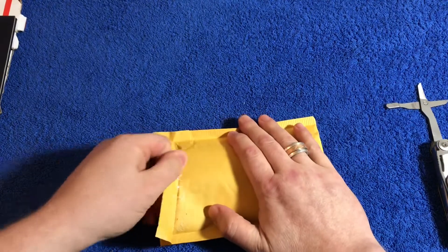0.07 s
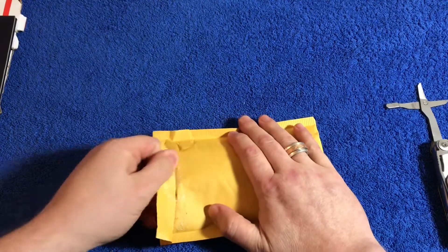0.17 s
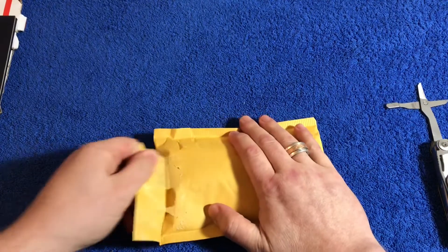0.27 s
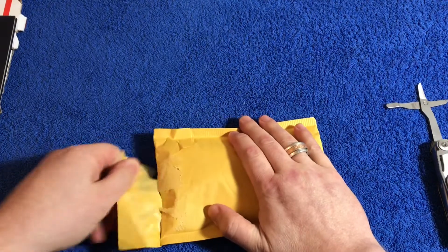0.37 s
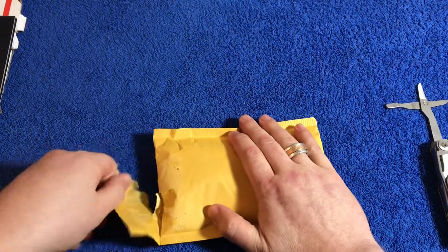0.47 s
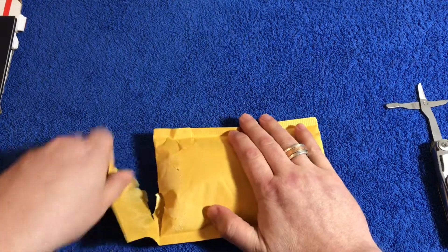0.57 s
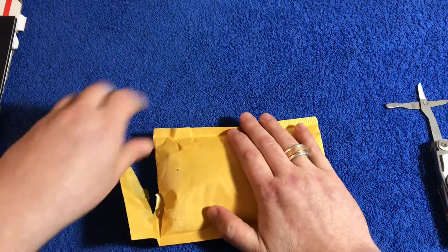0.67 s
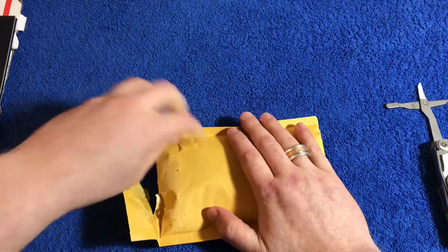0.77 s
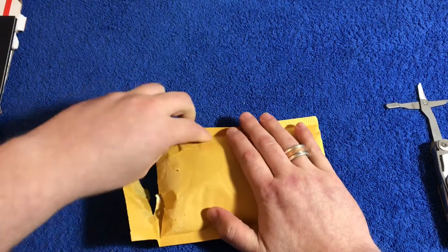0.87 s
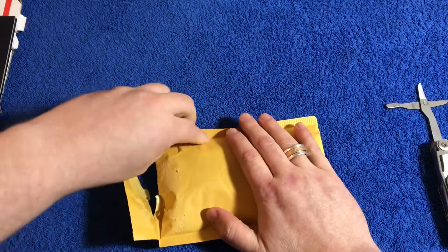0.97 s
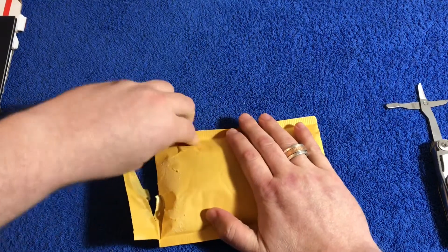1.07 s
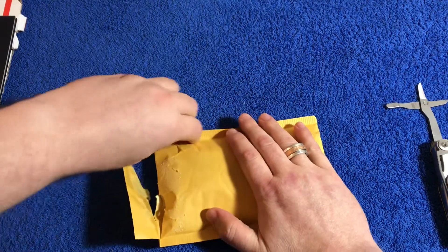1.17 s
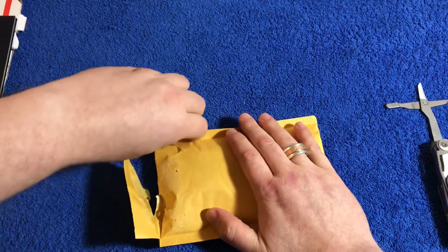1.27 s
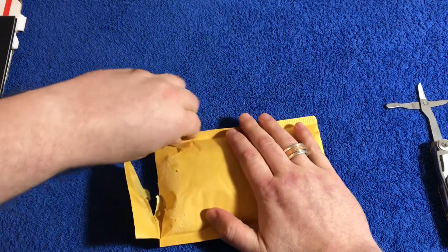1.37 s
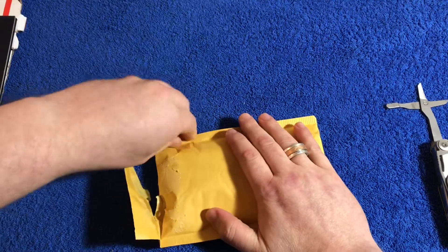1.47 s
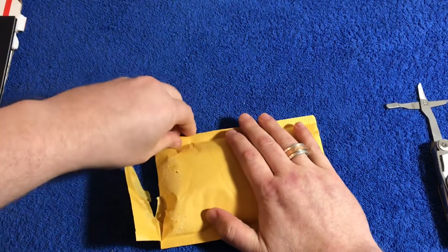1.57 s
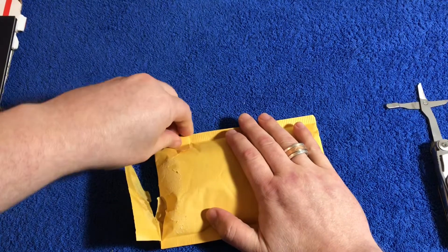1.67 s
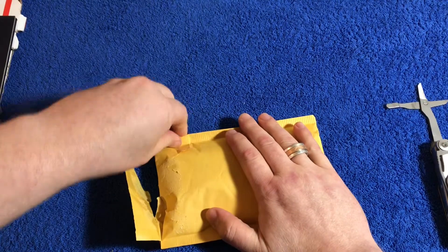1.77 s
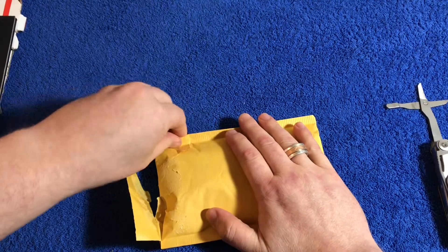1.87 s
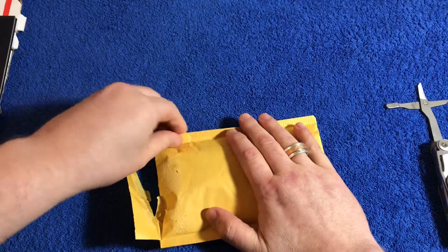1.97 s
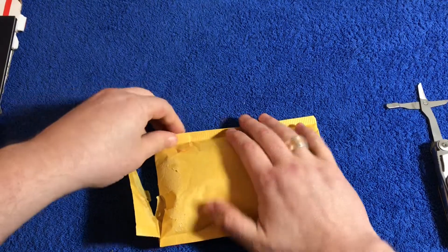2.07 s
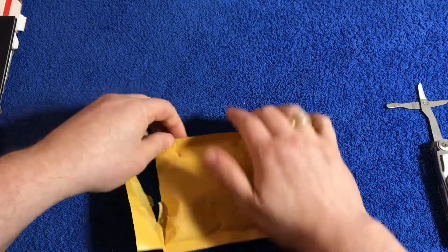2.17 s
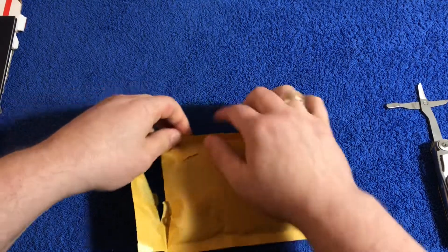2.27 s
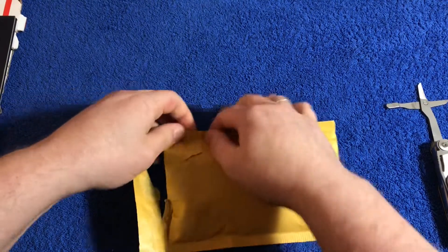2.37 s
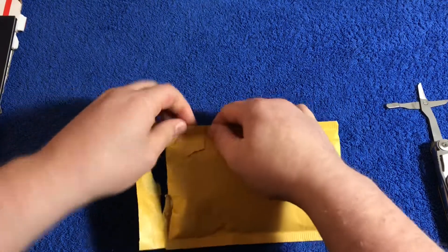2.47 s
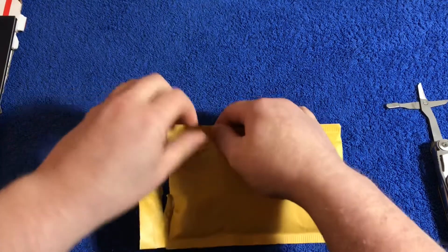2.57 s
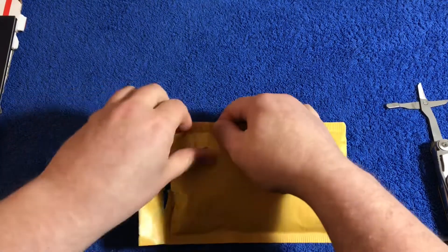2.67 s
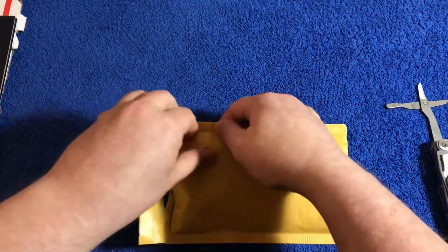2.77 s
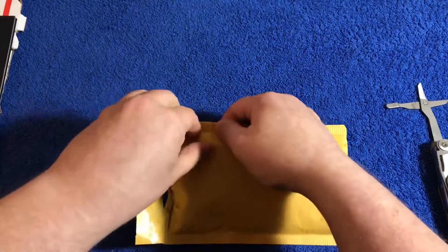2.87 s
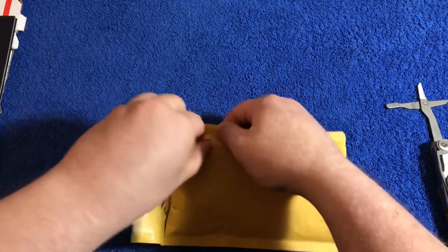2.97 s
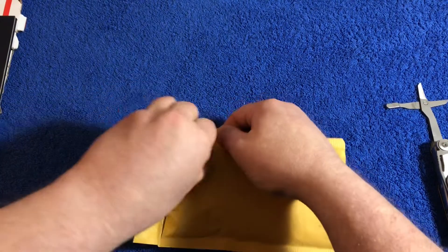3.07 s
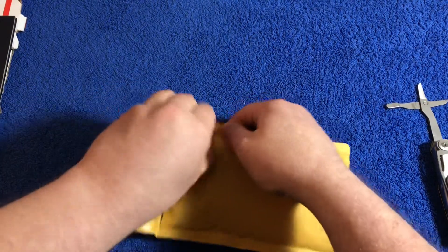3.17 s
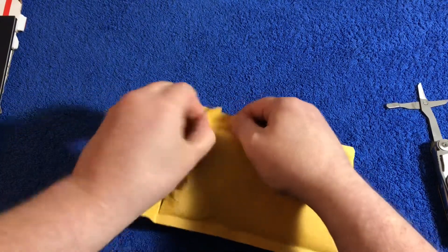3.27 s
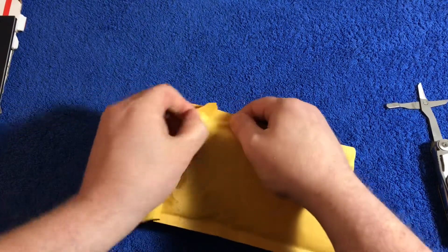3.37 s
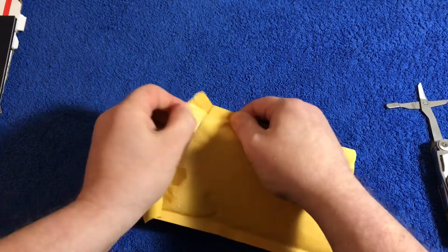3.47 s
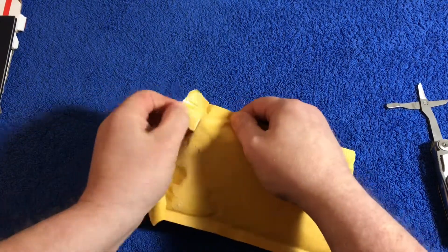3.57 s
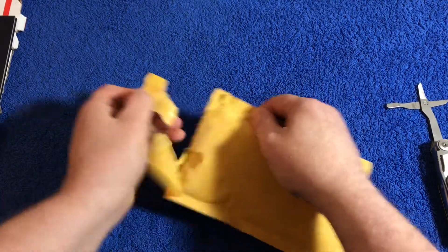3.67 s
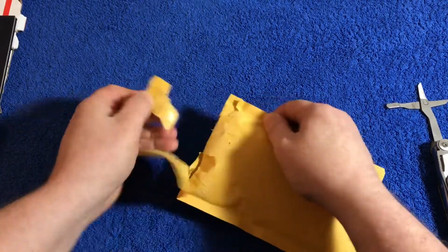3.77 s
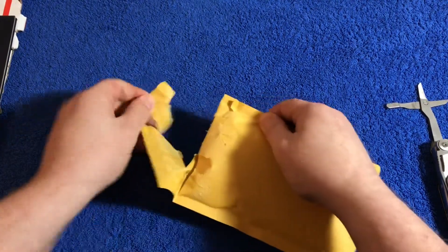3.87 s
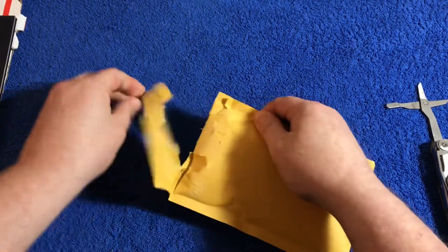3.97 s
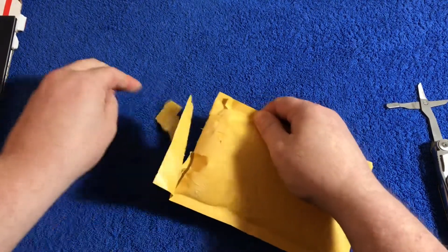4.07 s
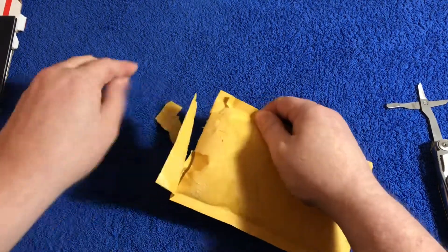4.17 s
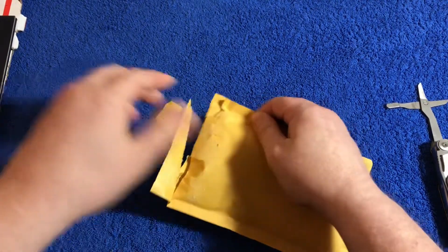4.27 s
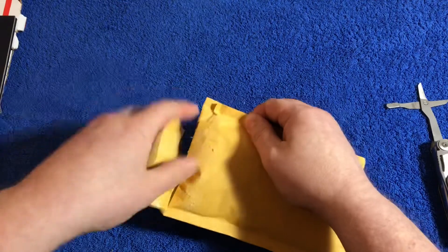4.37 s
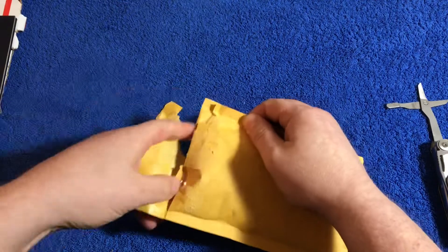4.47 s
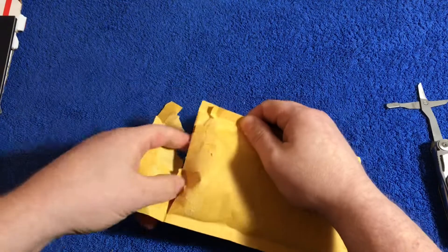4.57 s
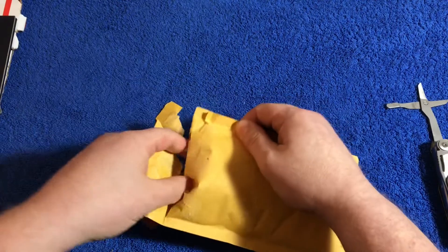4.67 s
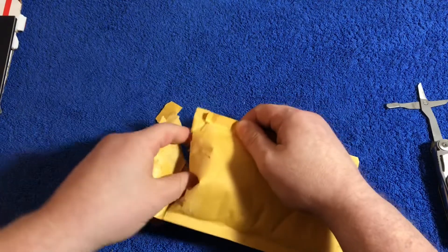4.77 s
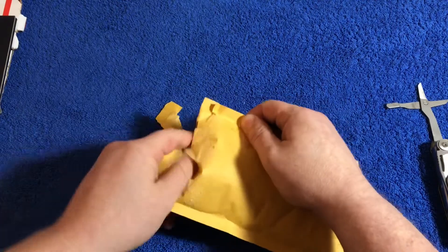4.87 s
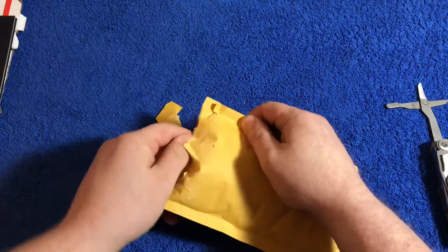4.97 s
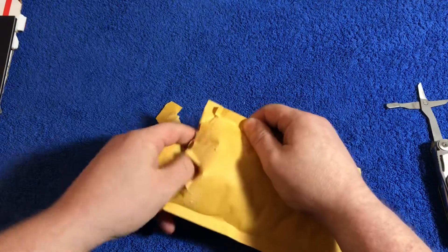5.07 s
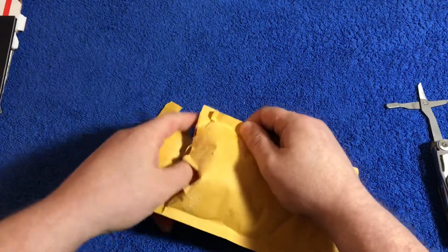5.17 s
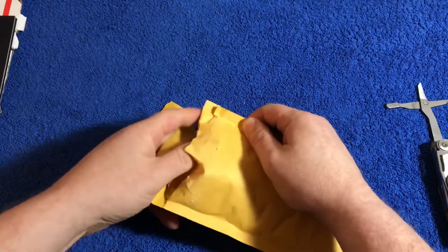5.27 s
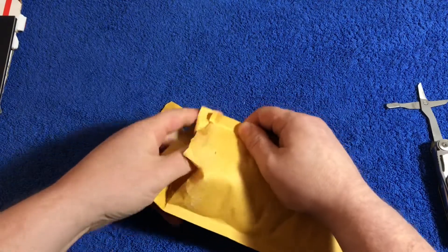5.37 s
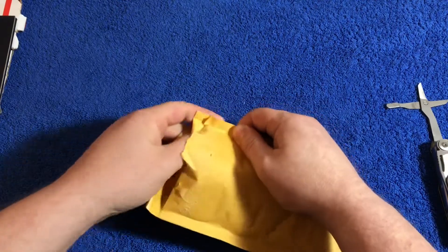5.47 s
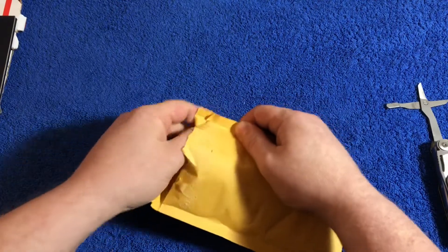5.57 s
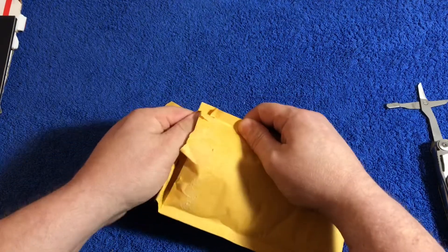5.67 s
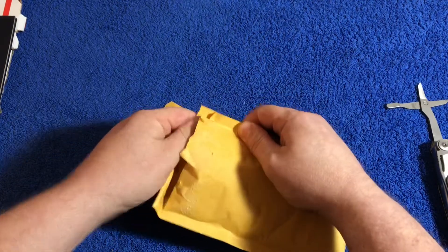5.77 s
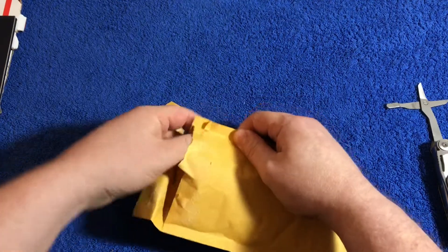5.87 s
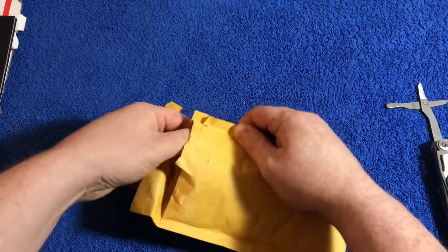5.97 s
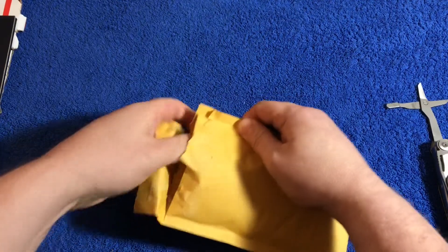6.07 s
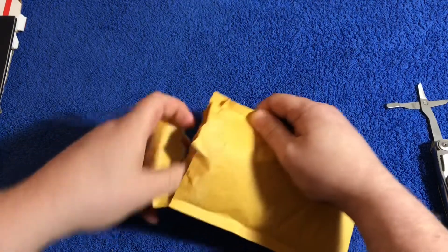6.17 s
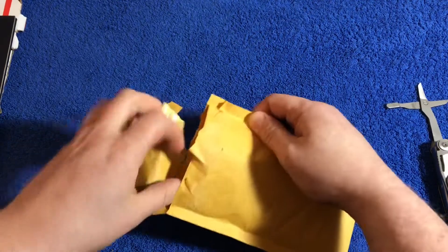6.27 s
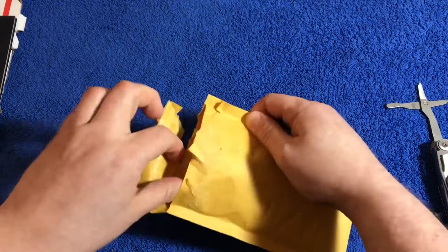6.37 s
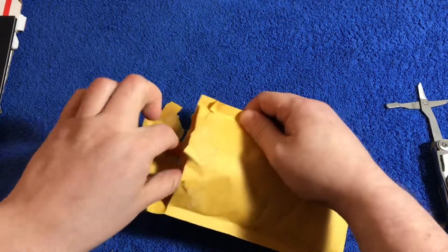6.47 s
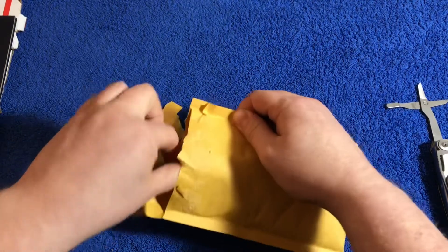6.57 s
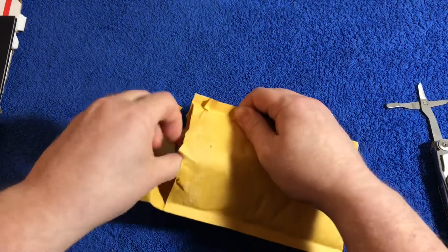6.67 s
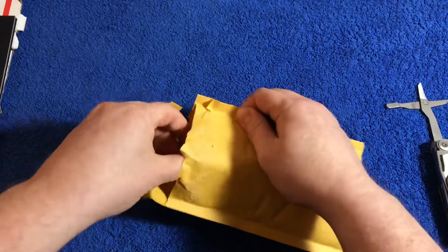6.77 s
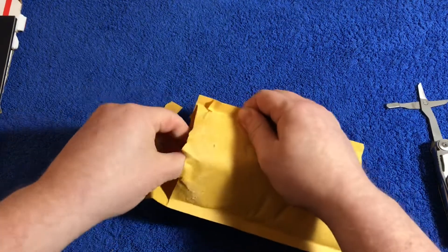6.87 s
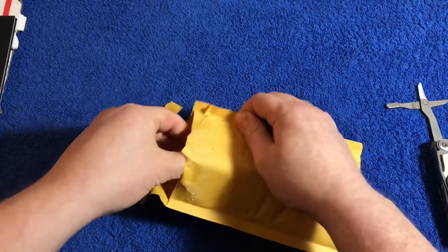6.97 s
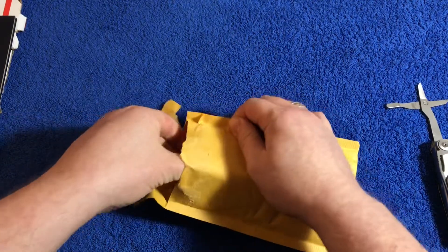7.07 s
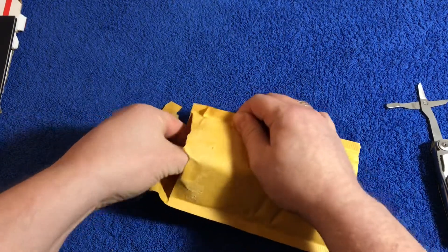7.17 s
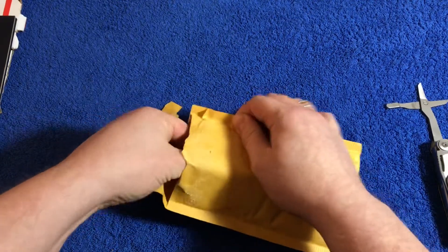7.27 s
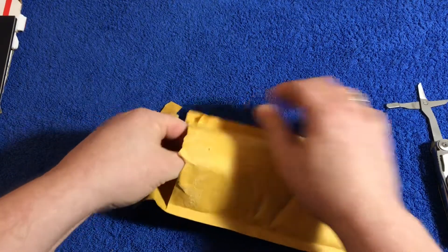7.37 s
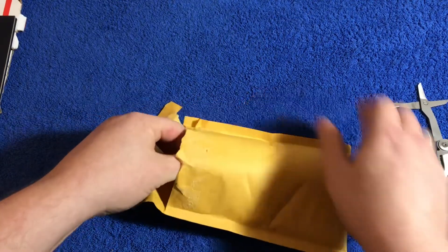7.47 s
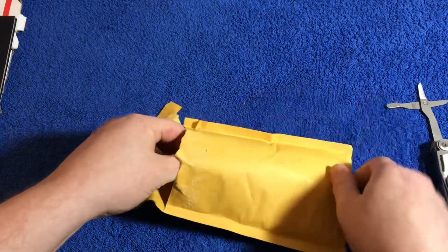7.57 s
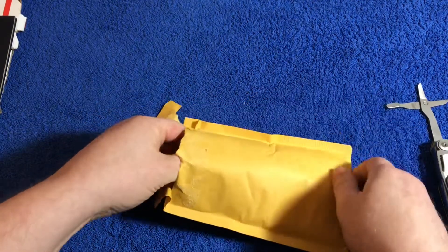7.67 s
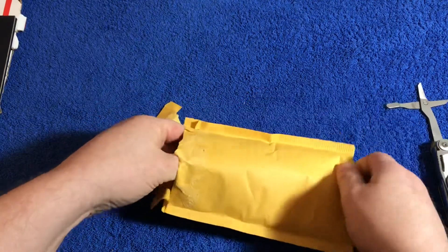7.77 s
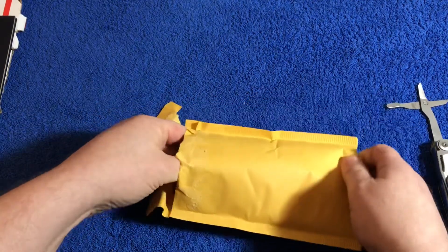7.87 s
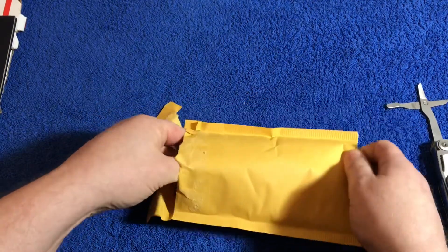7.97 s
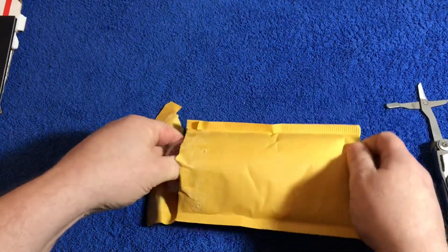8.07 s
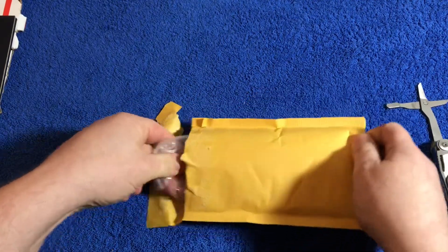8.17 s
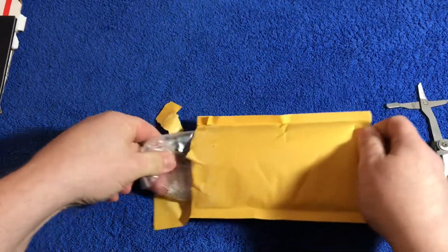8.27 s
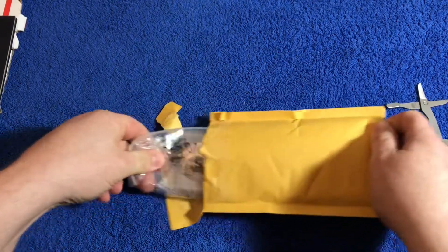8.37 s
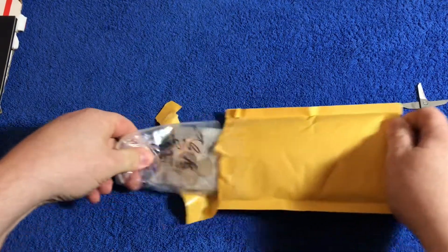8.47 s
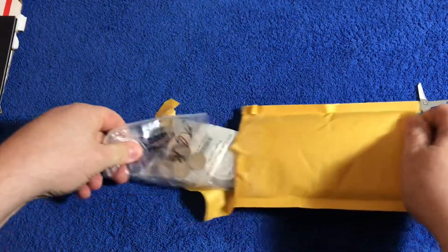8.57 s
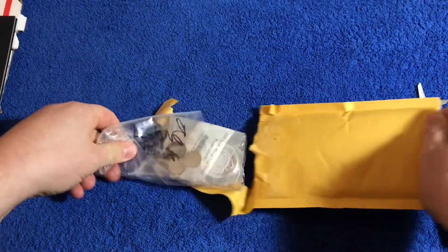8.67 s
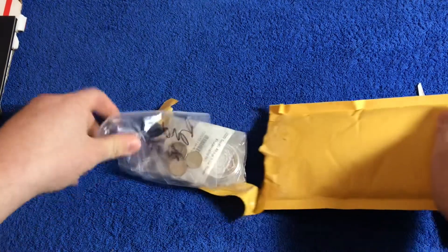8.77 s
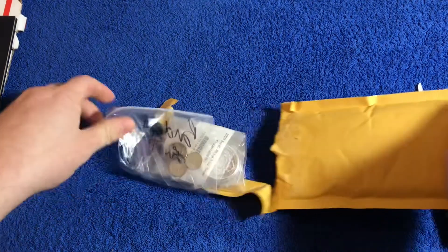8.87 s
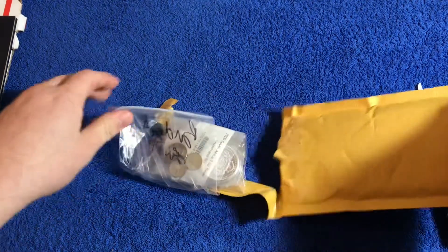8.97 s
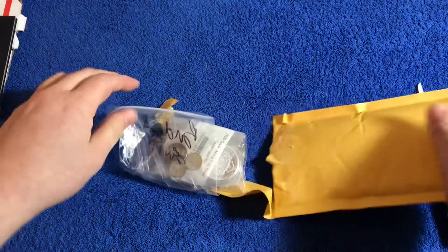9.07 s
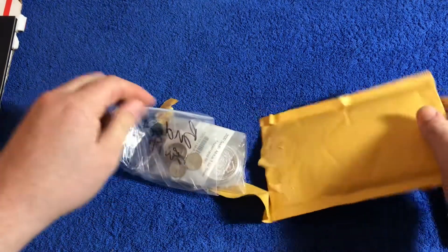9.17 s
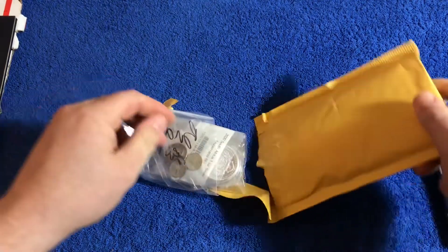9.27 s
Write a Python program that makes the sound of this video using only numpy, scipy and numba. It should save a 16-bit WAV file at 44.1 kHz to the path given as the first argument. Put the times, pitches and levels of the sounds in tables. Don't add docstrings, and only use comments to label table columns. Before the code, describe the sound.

Stiff padded paper tears in quick bursts, then crinkles, pops and rustles more softly as something is drawn out in a quiet room.

```python
import sys
import numpy as np
from scipy import signal
from scipy.fft import rfft, irfft
from scipy.io import wavfile
from scipy.ndimage import uniform_filter1d
from numba import njit

SR = 44100
rng = np.random.default_rng(int(sys.argv[2]) if len(sys.argv) > 2 else 0)


def int16_out(signal):
    q = np.round(np.clip(np.atleast_2d(signal).T, -1, 1) * 32767)
    wavfile.write(sys.argv[1], SR, q.astype(np.int16))


def gain_from_db(level_db):
    decades = np.asarray(level_db, float) / 20
    return 10 ** decades


N = 410130

# peak_s, crinkle_db, rise_ms per 10 dB, fall_ms per 10 dB, fibres_db re crinkle
RIP_MOVES = [(.1, -46.5, 900, 64, 3.5), (.174, -28, 48, 118, -0.5), (.27, -32, 160, 66, -1),
             (0.33, -22.5, 82, 25, -5), (0.404, -24.5, 24, 44, -6), (.49, -36.5, 30, 100, -13),
             (3.209, -32, 27, 33, -7.5), (3.404, -42, 93, 74, 4), (3.541, -22.5, 4, 64, -3),
             (3.591, -32.5, 56.5, 10, 6.5), (4.515, -37, 31, 83, -8.5), (4.592, -38, 58, 300, -7),
             (4.783, -33.5, 27, 48, -4), (5.221, -23.5, 19, 14.5, -5.5), (5.765, -42, 68, 130, -4.5)]
PICK_MOVES = [(0.752, -45, 1.9, 44, 1.5), (0.796, -37.5, 19, 28, -2.5), (1.003, -42.5, 67, 33, -5),
              (1.236, -44, 37, 170, -16), (1.442, -46.5, 38, 49, -3), (1.685, -44, 30, 27, -4.5),
              (2.05, -50, 71, 54, -3), (2.29, -47.5, 26, 66, -2.5), (2.322, -44, 38, 60, -18),
              (2.776, -59.5, 150, 58, 9), (2.864, -44, 20, 140, -6.5), (3.905, -58.5, 450, 12, 2),
              (4.13, -56.5, 12, 79, -14.5), (6.077, -41, 270, 120, -9), (8.259, -29.5, 23, 44, -18),
              (9.026, -37.5, 86, 120, -14.5)]
SQUEEZE_MOVES = [(0.447, -27, 12, 18, -5.5), (1.926, -36, 36, 50, -9.5), (2.175, -42.5, 166, 39, -16),
                 (2.438, -41.5, 80, 44, -10), (2.582, -35, 11, 46, -13), (3.006, -40, 82, 34, -6.5),
                 (3.27, -31, 52, 99, -14), (3.487, -43, 170, 14, -17), (3.66, -41, 95, 187, -10),
                 (4.296, -47, 5.6, 97, -3.5), (4.346, -36, 17, 94, -4.5), (4.82, -26.5, 3, 23, 3.5),
                 (4.85, -29, 34, 61, -6), (4.991, -35, 27, 120, -6), (5.321, -42.5, 18, 6.3, 15),
                 (5.353, -31.5, 114, 200, -11.5), (5.544, -34.5, 12, 130, -7), (5.575, -31, 48, 60, -4)]
REACH_MOVES = [(6.113, -42, 37, 200, -5.5), (6.337, -49, 77, 34.4, 4.5), (6.501, -39, 150, 90, -11.5),
               (6.588, -37.5, 36, 31.8, -12), (6.694, -37.5, 20, 45.5, -9), (6.894, -38.5, 59, 150, -8.5),
               (7.148, -41, 370, 100, -9), (7.333, -33, 143, 78, -10.5), (7.518, -37, 11, 120, -11.5),
               (7.675, -34, 110, 147, -12.5), (8.041, -43.5, 330, 300, -8), (8.488, -39.5, 470, 240, -9),
               (8.754, -42, 160, 141, -11), (9.29, -52.5, 93, 100, -3)]
MOVE_KINDS = (RIP_MOVES, PICK_MOVES, SQUEEZE_MOVES, REACH_MOVES)


def unit(x):
    return x / np.sqrt(np.mean(x ** 2))


def colour(x, table):
    hz, db = np.transpose(table)
    grid_hz = np.linspace(1, SR / 2, 8193)
    log_gain = np.interp(np.log(grid_hz), np.log(hz), db) * np.log(10) / 20
    cepstrum = irfft(log_gain)
    cepstrum[1:8192] *= 2
    cepstrum[8193:] = 0
    impulse = irfft(np.exp(rfft(cepstrum)))
    return signal.fftconvolve(x, impulse)[:N]


def walk(rate):
    hold = int(SR / rate)
    steps = np.repeat(rng.standard_normal(N // hold + 1), hold)
    return unit(uniform_filter1d(steps, hold // 2 + 1)[:N])


def room():
    # hz, level_db per Hz
    air_colour = [(25, -17), (42, -11), (53, 2.5), (68, -6.5), (100, -7), (165, -10), (260, -10),
                  (330, -11.5), (450, -24.5), (2000, -34.5), (6000, -29.5), (16000, -46)]
    air = unit(colour(rng.standard_normal(N), air_colour)) * gain_from_db(-61.5 + 0.13 * walk(1.0))
    hum_hz, hum_db = 120, -63
    hum = np.sin(2 * np.pi * hum_hz * np.arange(N) / SR) * gain_from_db(hum_db + 1.6 * walk(12))
    return air + hum


def rumble():
    # time_s, level_db
    drone_level = [
        (0, -75),
        (1.0, -77),
        (1.3, -61),
        (1.9, -68),
        (2.4, -76),
        (6.4, -93),
        (7.0, -58),
        (7.5, -63),
        (7.9, -70),
        (8.4, -74),
    ]
    centre_hz = 50.7
    band_hz = [centre_hz / 1.2, centre_hz * 1.2]
    band = signal.butter(2, band_hz, "band", fs=SR, output="sos")
    low = signal.sosfilt(band, rng.standard_normal(N))
    return unit(low) * gain_from_db(np.interp(np.arange(N) / SR, *np.transpose(drone_level)))


def tail(x):
    t60_s, level_db, dull_hz = 0.084, -15.5, 4300
    t = np.arange(SR // 2) / SR
    fade = np.exp(-np.log(1000) * t / t60_s) * (1 - np.exp(-t / 0.0005))
    echo = rng.standard_normal(len(t)) * fade
    echo = signal.lfilter(*signal.butter(1, dull_hz, fs=SR), echo)
    echo = echo / np.sqrt(np.sum(echo ** 2))
    return gain_from_db(level_db) * signal.fftconvolve(x, echo)[:N]


@njit
def pops(count, start, hz, t60, size, rate, rise):
    out = np.zeros(count)
    for k in range(len(start)):
        turn = np.exp(2j * np.pi * hz[k] / rate - np.log(1000) / (t60[k] * rate))
        unrisen_step = np.exp(-hz[k] / (rise * rate))
        unrisen = 1.
        z = size[k] + 0j
        first = int(start[k])
        for i in range(first, min(count, first + int(t60[k] * rate))):
            z = z * turn
            unrisen = unrisen * unrisen_step
            out[i] += z.imag * (1 - unrisen)
    return out


def ring(s, hz, cycles, size, rise=0.042):
    start = np.clip(s * SR, 0, N - 1.)
    return pops(N, start, hz, cycles / hz, size, 1. * SR, rise)


def bumps(count=4):
    # start_s, pitch_hz, level_db
    pushes = [(8.745, 196, -42), (0.391, 300, -30.5), (0.415, 85, -43), (0.51, 340, -45),
              (3.555, 194, -37.5), (3.569, 72, -51), (7.252, 330, -33), (7.518, 64, -44), (4.985, 580, -21),
              (5.307, 408, -34), (5.771, 280, -42), (6.447, 360, -37), (8.03, 430, -40.5),
              (7.516, 950, -19), (2.003, 460, -40), (9.13, 390, -43), (1.227, 680, -42), (2.109, 840, -32),
              (2.59, 510, -55), (4.34, 750, -34), (4.82, 600, -26), (5.32, 540, -23.5), (8.245, 1100, -37),
              (8.4, 830, -31), (8.987, 1000, -29), (9.013, 440, -40), (.425, 590, -34)]
    s, hz, db = np.transpose(pushes)[:, :, None]
    late, step = np.moveaxis(rng.random((len(s), 2, count)), 1, 0)
    mode_hz = hz * 1.256 ** (np.arange(count) - 1 + step - .5)
    start_s = s + 2.35 * late / hz
    size = gain_from_db(db + 7.5) + 0 * late
    return ring(start_s.ravel(), mode_hz.ravel(), 7.7, size.ravel(), rise=0.94)


def fits(per_s, tau_s):
    kicks = (rng.random(N) < per_s / SR) * np.minimum(rng.exponential(size=N), 3)
    return signal.lfilter([1], [1, -np.exp(-1 / (tau_s * SR))], kicks)


def moves(grip_db, haste, extra_db):
    # time_s, crinkle_db
    finger_grip = [(0, -35), (.5, -53), (.73, -57.5), (.85, -48.5), (1.1, -48), (1.4, -55.5), (1.62, -59.5),
                   (1.87, -81), (2.0, -46), (2.53, -57.5), (2.68, -45.5), (3.15, -43.5), (3.95, -70),
                   (4.28, -76), (4.7, -59), (5.2, -40.5), (5.9, -62), (9.3, -48)]
    t = np.arange(0, N, 32) / SR
    power = gain_from_db(np.interp(t, *np.transpose(finger_grip)) + grip_db) ** 2
    for (s, db, rise_ms, fall_ms, _), extra in zip(np.concatenate(MOVE_KINDS), extra_db):
        ms_per_10_db = np.where(t < s, max(rise_ms, 2), max(fall_ms, 2))
        below_peak_db = haste * 10 * 1000 * np.abs(t - s) / ms_per_10_db
        power = power + gain_from_db(db + extra - below_peak_db) ** 2
    return np.interp(np.arange(N) / SR, t, 10 * np.log10(power))


def rustle(lo_hz, hi_hz, clumps, loose, cycles, scatter_db, count):
    # hz, level_db per Hz
    paper_colour = [(120, -17), (330, -8), (700, -7), (1000, -3.5), (1700, -1.5), (3000, -4), (3750, -4.5),
                    (4300, -4.5), (4950, -7), (6000, -3.5), (7800, -9.5), (9300, -7.5), (10500, -12.5),
                    (11500, -8)]
    when, pitch, turn = rng.random((count, 3)).T
    at = (when * N).astype(int)
    hz = lo_hz * (hi_hz / lo_hz) ** pitch
    rare = np.minimum(rng.exponential(size=count), 5)
    favoured_db = 4.56 * np.cos(2 * np.pi * 1.3 * np.log2(hz) + 2.37 * walk(25)[at])
    size = gain_from_db(loose[at] * scatter_db * (rare - 6.0) + favoured_db)
    size = size * np.sign(turn - .5) * hz / hi_hz * clumps[at]
    return unit(colour(ring(when * N / SR, hz, cycles, size), paper_colour))


def hollow(clumps, count=9000):
    # time_s, pitch_hz, level_db re crinkle
    pouch_pitch = [(0, 1405, 0), (.2, 1510, 1.5), (.33, 1910, 5.5), (.43, 2500, 2), (.6, 1520, -5),
                   (2.48, 1430, -3.5), (2.72, 1880, -11), (3.3, 1430, -23), (3.94, 2130, -10),
                   (4.25, 1510, -1.5), (4.79, 1670, -5), (5.0, 980, 2), (5.3, 1670, -31), (6.24, 1340, -5),
                   (7.4, 1154, -5), (8.3, 1230, -3.5), (8.75, 1660, -7), (9.0, 1080, -6)]
    when, spread, turn, rare = rng.random((count, 4)).T
    s, centre_hz, db = np.transpose(pouch_pitch)
    order = np.argsort(np.argsort(when))
    drift = unit(uniform_filter1d(turn - .5, size=90))[order]
    hz = np.interp(when * N / SR, s, centre_hz) * 1.47 ** (spread - .5) * 1.185 ** drift
    size = gain_from_db(np.minimum(-2.5 * np.log(rare), 12)) * np.sign(turn - .5)
    size = size * clumps[(when * N).astype(int)]
    air = unit(ring(when * N / SR, hz, 18.4, size, rise=0.28))
    return air * gain_from_db(np.interp(np.arange(N) / SR, s, db))


def handling():
    panel_flex = [
        -19,
        -20.5,
        -2,
        -3,
    ]
    flex_db = np.repeat(panel_flex, [len(k) for k in MOVE_KINDS])
    fibre_extra_db = np.concatenate(MOVE_KINDS)[:, -1]
    crease_db = moves(0, 1, 0 * flex_db)
    panel_db = moves(-11, 1.49, flex_db)
    fibre_db = moves(-14, 1.4, fibre_extra_db)
    loose = np.clip((-23.0 - fibre_db) / 18, .35, 1)
    whole = fits(90, .0015)
    panel_clumps = 1 + loose * (0.24 * whole + 0.55 * fits(49, 0.011))
    panels = rustle(151.4, 998, panel_clumps, loose, cycles=12.0, scatter_db=2.0, count=9000)
    crease_clumps = 1 + loose * (0.5 * whole + 0.66 * fits(90, 0.017))
    creases = rustle(878, 4420, crease_clumps, loose, cycles=6.7, scatter_db=1.0, count=40000)
    fibre_clumps = 1 + loose * (0.84 * whole + 0.62 * fits(110, 0.0035))
    fibres = rustle(4300, 15100, fibre_clumps, loose, cycles=7.6, scatter_db=0.5, count=90000)
    creases = creases + hollow(1 + 0.71 * fits(54, 0.0055))
    return gain_from_db(panel_db - 8.5) * panels + gain_from_db(crease_db - 7.0) * creases + gain_from_db(fibre_db + 5.5) * fibres


def snaps(count=16):
    # start_s, peak_db, pitch_hz, burst_ms
    ticks = [(.338, -4, 1920, 1.56), (.7827, -23, 1750, 1), (.7938, -21, 1770, 0.42),
             (.8816, -14, 3320, 0.56), (1.151, -21, 2800, 0.41), (1.2264, -16, 1480, 0.83),
             (2.3163, -4.5, 6200, 0.14), (2.63, -24, 1900, 0.57), (3.188, -20, 6400, 0.3),
             (3.2063, 0, 5300, 0.63), (3.9375, -32, 2180, 0.12), (3.949, -24.5, 6900, 1.04),
             (4.0374, -38, 3400, 0.46), (4.5812, -16, 1710, 0.55), (4.7585, -7.5, 5870, 0.45),
             (5.5376, -2.5, 5970, .5), (5.5398, -8, 6340, 0.47), (6.1221, -18.5, 1680, 1.7),
             (7.1483, -19.5, 1680, 0.82), (7.3193, -10, 5430, 0.49), (7.343, -13.5, 1730, 0.32),
             (7.6155, -21, 2010, 0.5), (7.6648, -15, 1830, 0.56), (7.6772, -15, 1100, 0.48),
             (7.7284, -13, 1720, 0.84), (7.7609, -8, 6900, 0.61), (8.4328, -9.5, 3780, 0.44),
             (6.899, -19, 4600, 0.76), (8.369, -22, 3700, 0.77), (8.7436, -20.5, 1950, 0.65),
             (9.0376, -11, 4540, 1.05)]
    cracks = [(0.164, -9, 6000, 1.44), (0.1658, -7.5, 4500, 1.4), (0.3814, -11.5, 3060, 1.7),
              (0.3944, -6, 2300, 3.4), (0.411, -8.5, 2640, 1.95), (0.546, -23.5, 4660, 0.39),
              (2.8557, -24, 2140, 0.85), (3.1996, -15, 5640, 3.2), (3.279, -11, 4200, 3.2),
              (3.302, -12.5, 1670, 1.63), (3.441, -9.5, 7000, 1.5), (4.7504, -13.5, 7000, 0.22),
              (5.2161, -24, 1450, 0.92), (5.226, -14, 5970, 1.23), (5.2654, -11.5, 3140, 1),
              (5.4140, -5.5, 11900, 0.6), (5.483, -15.5, 4670, 0.44), (5.493, -19, 6960, 1.4),
              (5.5649, -3.5, 8350, 0.59), (5.6, -14.5, 1810, 1.1), (5.762, -14, 6800, 0.59),
              (6.5812, -15.5, 6460, 0.5), (6.692, -22.5, 1720, 0.31), (7.131, -20.5, 5530, 0.85),
              (7.1606, -16, 5280, 1.3), (8.4914, -20, 6340, 0.57), (8.5859, -20.5, 8350, 0.22)]
    slaps = [(0.0802, -17.5, 4480, 1.2), (.348, -12, 2040, 0.93), (2.1083, -17, 1520, 0.94),
             (2.9097, -20.5, 1960, 1.12), (3.4475, -19, 2080, 0.78), (3.592, -6.5, 1570, 1.98),
             (4.8175, -9, 3040, 3.3), (4.9831, -9, 2820, 0.82), (5.2746, -17.5, 1530, 0.76),
             (5.3052, -8.5, 2600, 0.81), (5.319, -9, 1580, 0.73), (5.372, -17, 734, 2),
             (5.3819, -15, 1660, 3.3), (5.609, -8.5, 5920, 0.73), (5.6333, -11, 5670, 0.43),
             (6.1031, -10, 4300, 1.21), (6.336, -20, 1130, 1.2), (6.503, -25, 1550, 1),
             (6.849, -19.5, 2130, 0.73), (6.99, -20.5, 1680, 0.9), (7.26, -18, 1850, 0.69),
             (7.3298, -7, 4500, 0.61), (7.7127, -13.5, 1400, 0.56), (8.244, -18, 1220, 1.5),
             (8.392, -20, 5380, 0.55)]
    knocks = [(2.527, -28, 1820, 0.93), (2.722, -26, 1940, 0.36), (4.6319, -19, 1740, 0.71),
              (4.781, -11, 2630, 0.64), (5.7766, -20.5, 1490, 0.62), (6.0024, -33, 1740, 0.69),
              (6.297, -25, 1180, 1.6), (6.449, -32, 1100, 1.5), (7.272, -23, 1500, 0.86),
              (6.8841, -16.5, 1000, 0.76), (7.3587, -15, 4340, 2.5), (7.5163, -7, 2900, 0.21),
              (7.6316, -28, 2120, 0.39), (7.745, -15.5, 6240, 1.34), (7.9016, -28, 2000, 0.18),
              (8.343, -20.5, 6300, 0.74), (8.399, -21.5, 920, 0.99), (8.029, -29, 1520, 0.94),
              (9.126, -29.5, 1390, 0.99), (8.986, -20, 950, 1.06), (9.012, -15.5, 1150, 3.3)]
    plucks = [(0.1777, -11, 1630, 0.4), (0.24, -14, 1440, 0.54), (0.3487, -25, 1960, 0.92),
              (0.3578, -19, 1590, 0.53), (0.4331, -11.5, 2700, 0.91), (0.7508, -31.5, 1150, 0.68),
              (0.8332, -28.5, 1250, 0.57), (2.398, -28.5, 1490, 0.76), (2.3166, -23, 1260, 0.21),
              (2.5805, -27, 1590, 0.42), (2.722, -20, 1740, 0.69), (3.0125, -25.5, 1690, 0.37),
              (3.5527, -11, 1450, 0.37), (3.7712, -29, 1430, 0.29), (3.369, -26, 3500, 1),
              (4.3365, -23.5, 1460, 0.69), (4.4662, -54, 960, 0.53), (4.694, -28, 1530, 0.9),
              (4.7495, -25, 1260, 0.88), (4.8331, -9, 1630, 0.75), (4.9766, -15, 2800, 0.4),
              (5.016, -19, 1520, 1), (5.2164, -12.5, 1460, 0.78), (5.4231, -26, 1550, 0.57),
              (5.5652, -19, 1530, 0.61), (5.6988, -25.5, 1210, 0.58), (6.0016, -27, 1650, 0.45),
              (6.672, -31, 1150, 0.5), (6.682, -24.5, 1700, 0.51), (6.956, -24, 2130, 0.49),
              (6.9892, -25, 920, 0.32), (7.2482, -26, 1720, 0.45), (7.2559, -39, 1570, 0.6),
              (7.33, -13.5, 1610, 0.7), (7.5852, -25, 1060, 0.3), (7.632, -30, 1170, 0.55),
              (7.714, -13, 1110, 0.38), (7.7454, -19.5, 1430, 0.37), (7.7738, -25, 1120, 0.45),
              (7.8267, -31, 1120, 0.94), (8.1336, -33, 1790, 0.65), (8.1741, -31, 2350, 0.63),
              (8.671, -28, 1870, 0.7), (8.7686, -27, 1900, 0.79), (8.859, -33, 1360, 0.68),
              (9.1208, -29.5, 1590, 0.39)]
    flicks = [(0.34, -4.5, 9800, 0.4), (0.784, -20, 4230, 0.55), (1.1498, -28, 4500, 0.45),
              (1.158, -35, 6310, 0.86), (1.286, -31, 6030, 0.88), (1.688, -24, 8680, 0.66),
              (2.8642, -23, 10830, 0.62), (3.051, -28.5, 3750, 0.6), (3.4463, -14, 5300, 0.92),
              (3.5944, -9, 4820, 0.44), (3.7156, -27.5, 7040, 0.47), (3.7942, -27, 5400, 0.72),
              (3.9359, -26, 6460, 0.63), (4.0068, -34.5, 5790, 0.68), (4.3792, -20, 3800, 0.59),
              (2.3164, -10.5, 3600, 0.276), (4.5829, -26, 3880, 0.66), (4.6321, -19.5, 5340, 0.82),
              (4.82, 2, 6940, 0.38), (4.8688, -20, 13950, 0.5), (5.114, -21, 6160, 0.54),
              (5.2744, -14, 3980, 0.6), (5.3044, -8, 4610, 0.79), (5.3757, -12, 4620, 0.72),
              (5.4077, -19, 5450, 0.69), (5.5395, -8, 5500, 0.9), (5.784, -21, 4610, 0.37),
              (5.8852, -28, 4130, 0.92), (5.913, -42, 4200, 0.23), (6.2202, -23, 5250, 0.53),
              (6.433, -28, 6870, 0.65), (6.536, -25, 6220, 0.83), (6.6361, -34, 3850, 0.7),
              (6.748, -29, 9650, 0.55), (6.8492, -12, 6000, 0.48), (6.8637, -24, 6220, 0.81),
              (7.136, -20, 4370, 0.57), (7.2024, -30, 5600, 0.67), (7.3585, -27, 4460, 0.89),
              (7.6156, -20, 4000, 0.67), (7.6634, -35, 3730, 0.46), (7.678, -11, 3680, 0.65),
              (8.1735, -26.5, 11400, 0.45), (8.243, -25, 4260, 0.63), (8.3933, -30, 5300, 0.6),
              (8.483, -26, 5710, 0.52), (8.757, -25.5, 9000, 0.43)]
    kind_crack = [
        -48,
        3.5,
        -2.5,
        -9,
        -12,
        -4.5,
    ]
    kind_pouch = [
        -11.5,
        -10,
        -4,
        -3.5,
        -12.5,
        -14.5,
    ]
    kinds = (ticks, cracks, slaps, knocks, plucks, flicks)
    s, peak_db, hz, ms = np.concatenate(kinds).T[:, :, None]
    lengths = [len(k) for k in kinds]
    crack_db = np.repeat(kind_crack, lengths)[:, None]
    pouch_db = np.repeat(kind_pouch, lengths)[:, None]
    delay, pitch, size, turn = np.moveaxis(rng.random((len(s), 4, count)), 1, 0)
    follows = np.arange(count) > 0
    late = -np.log(delay) * np.clip(ms, .1, 8) / 1000 * follows
    fade = gain_from_db(follows * (-2.6 / (ms + 0.016) - 22.3 * size - 1500 * late)) * np.sign(pitch - .5)
    fade = gain_from_db(peak_db) * fade / np.sqrt(np.sum(fade ** 2, axis=1, keepdims=True))
    pitch = (pitch[:, :1] + np.arange(count) * (np.sqrt(5) - 1) / 2) % 1
    near_hz = np.where(follows, hz ** .45 * (1000 * 8 ** pitch) ** (1 - .45), hz)
    crack_hz = 6500 * 2.4 ** pitch
    pouch_hz = 1200 / 1.67 ** (turn ** 2)
    near_size = fade * gain_from_db(3.0) * np.sqrt(np.minimum(near_hz / hz, 1))
    crack_size = fade * gain_from_db(crack_db + 6.5) * np.sqrt(crack_hz / 3000)
    pouch_size = fade * gain_from_db(pouch_db + 2.5) * np.sqrt(pouch_hz / hz)
    crack_s = s + late + 0.001 * turn
    pouch_s = s + 0.00043 + 1.835 * late
    out = ring((s + late).ravel(), near_hz.ravel(), 12.35, near_size.ravel(), rise=0.53)
    out += ring(crack_s.ravel(), crack_hz.ravel(), 3.5, crack_size.ravel(), rise=0.24)
    out += ring(pouch_s.ravel(), pouch_hz.ravel(), 4.1, pouch_size.ravel(), rise=0.077)
    return signal.sosfilt(signal.butter(3, 450, "high", fs=SR, output="sos"), out)


def scene():
    paper = handling() + snaps()
    return (paper + tail(paper) + bumps() + room() + rumble())[None]


def low_pass(x):
    return signal.sosfilt(signal.butter(12, 16990, fs=SR, output="sos"), x)


def record(dry):
    # hz, gain_db
    treble_end = [(20, 0), (15650, 0), (15950, -26), (16550, -26), (16800, -80)]
    rounded = np.tanh(dry[0])
    return low_pass(colour(rounded, treble_end)[None])


dry = scene()
out = record(dry)
int16_out(out)
```